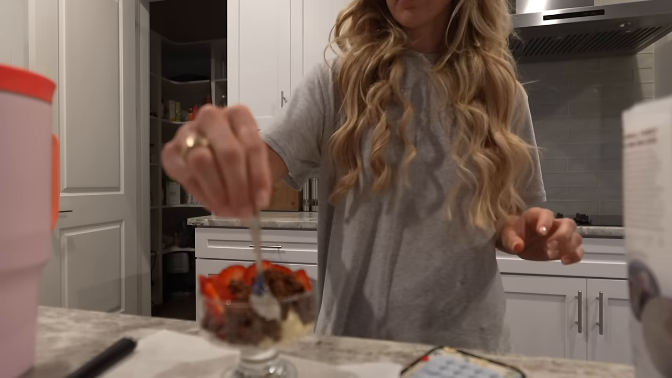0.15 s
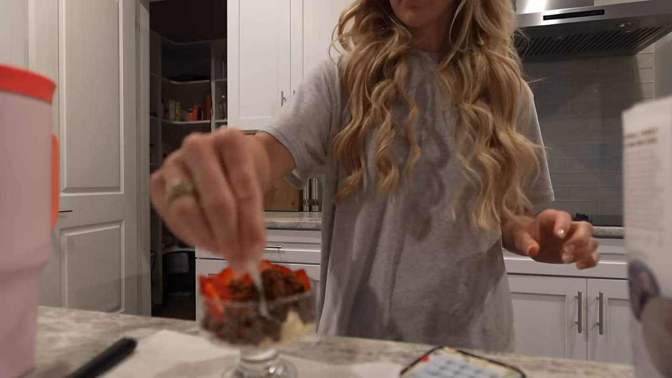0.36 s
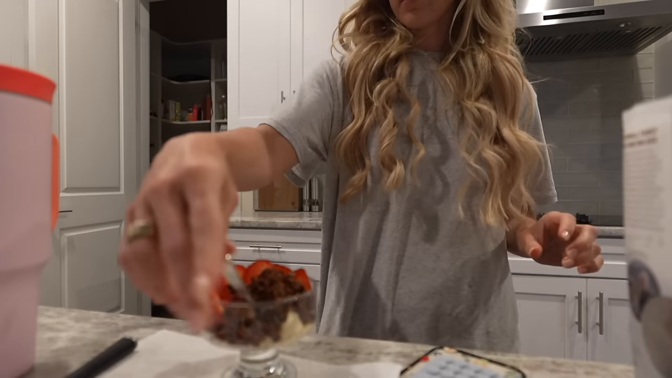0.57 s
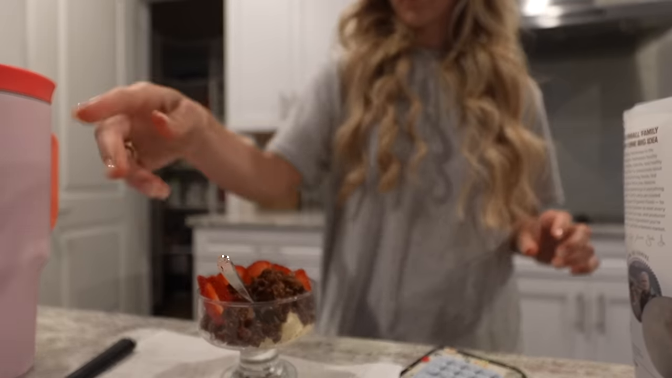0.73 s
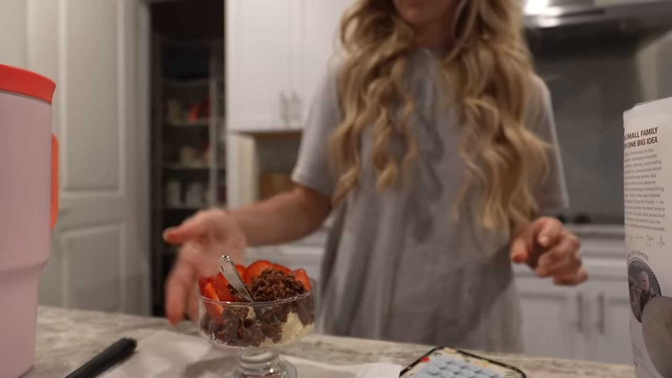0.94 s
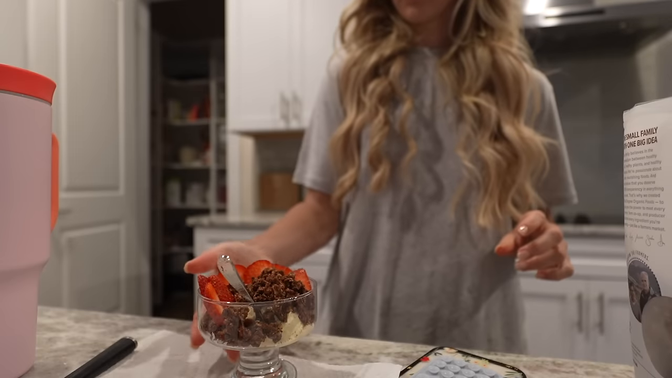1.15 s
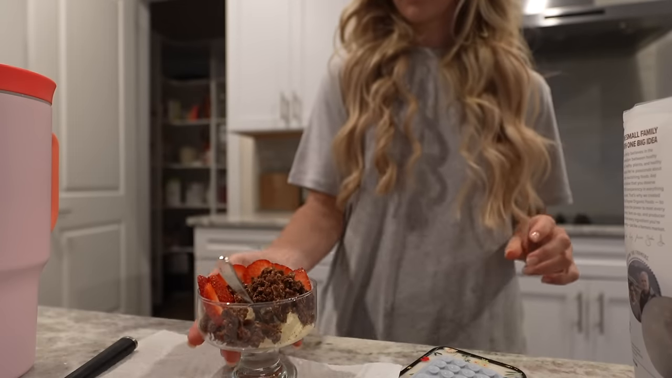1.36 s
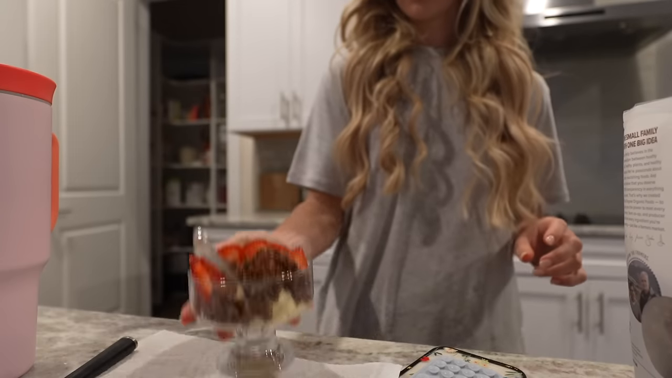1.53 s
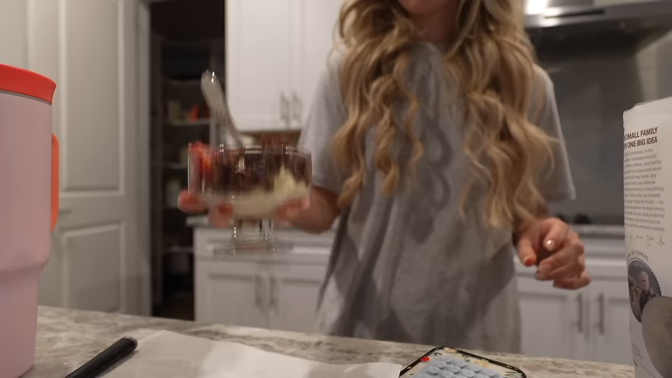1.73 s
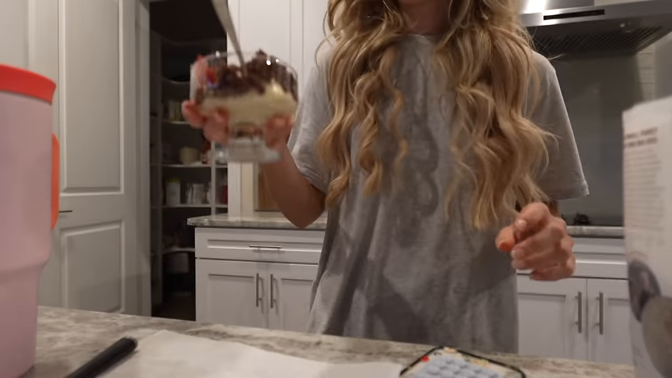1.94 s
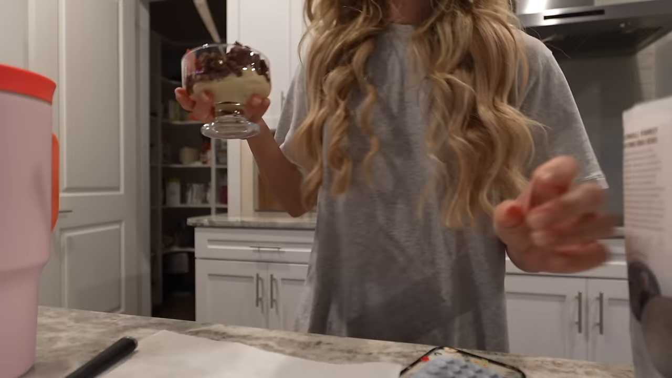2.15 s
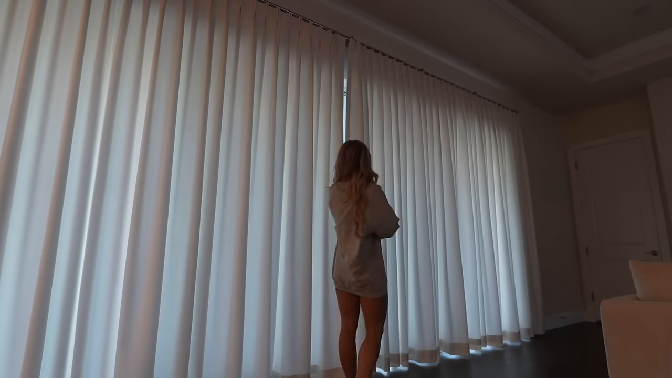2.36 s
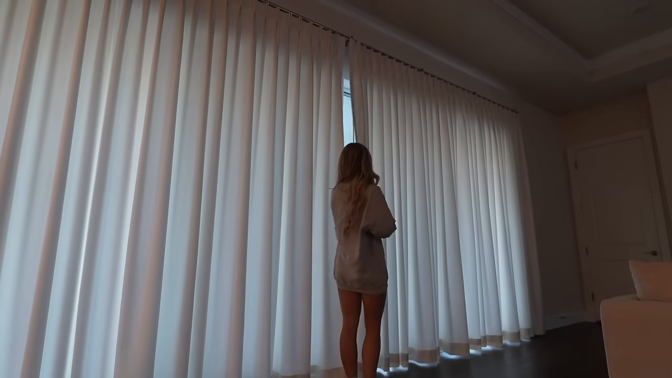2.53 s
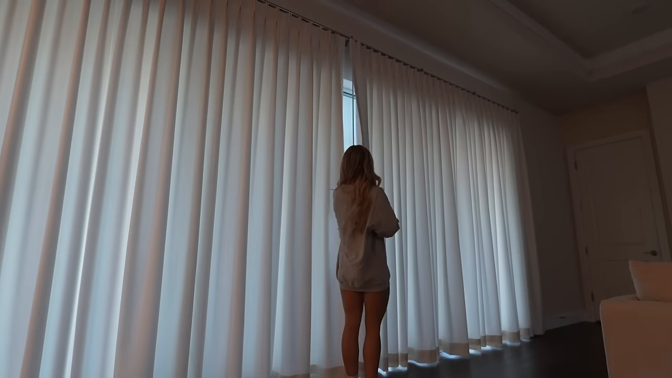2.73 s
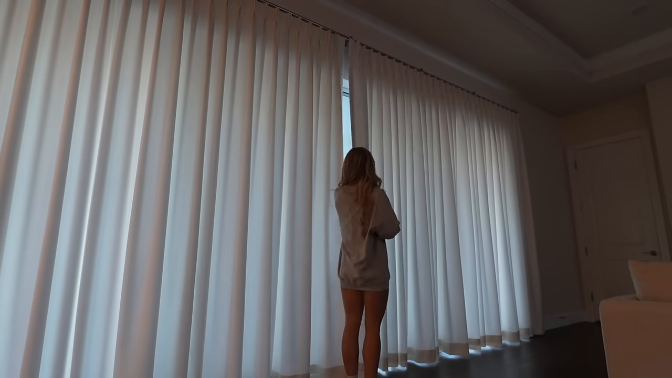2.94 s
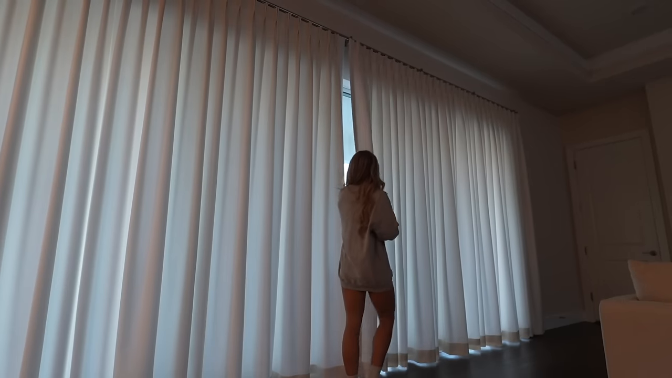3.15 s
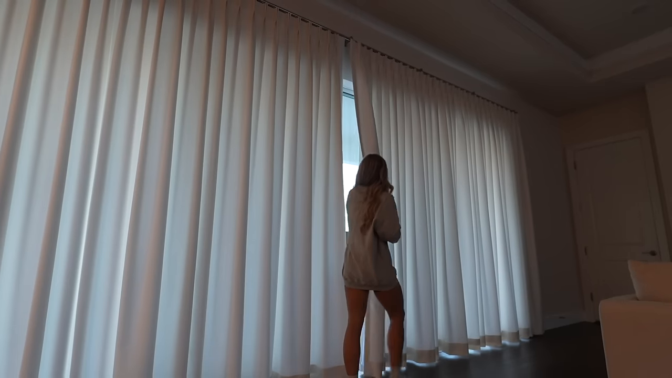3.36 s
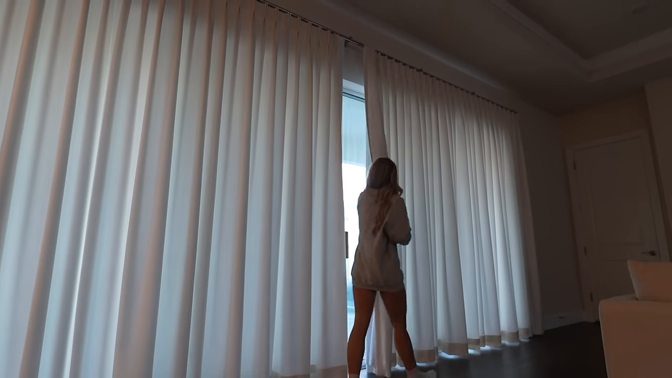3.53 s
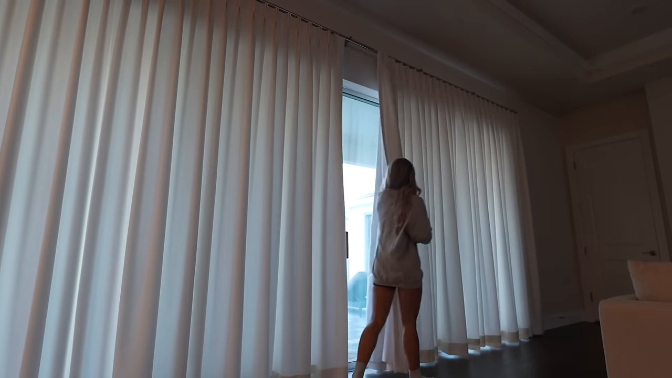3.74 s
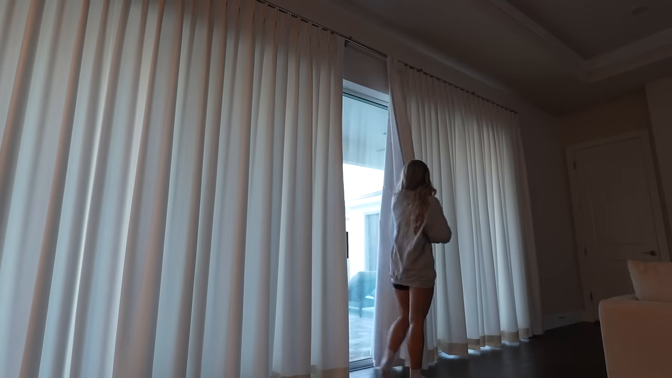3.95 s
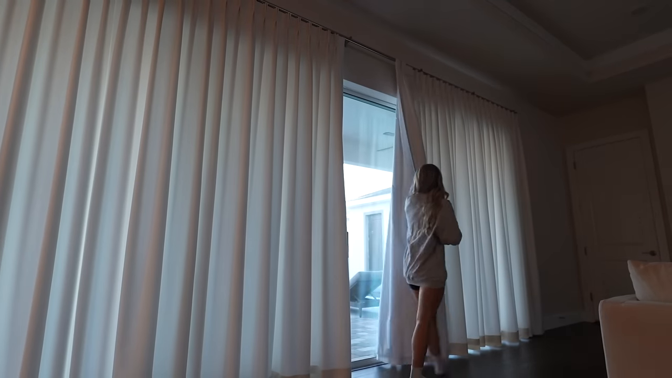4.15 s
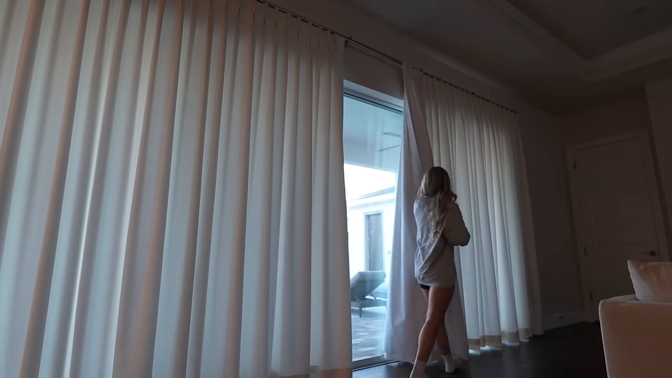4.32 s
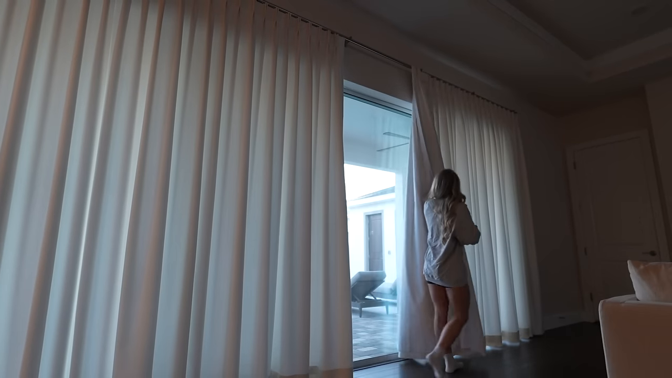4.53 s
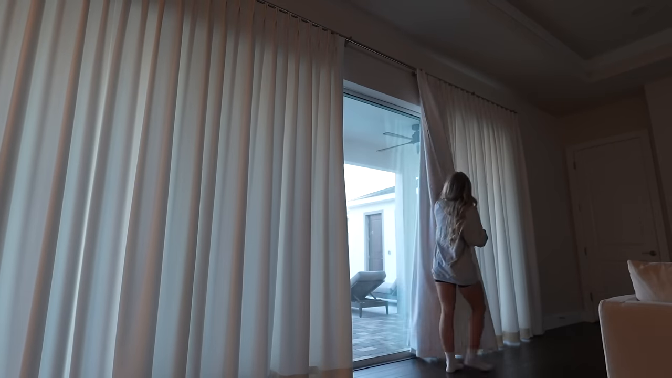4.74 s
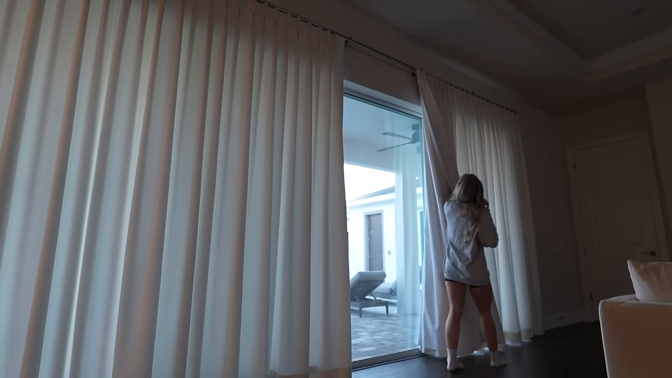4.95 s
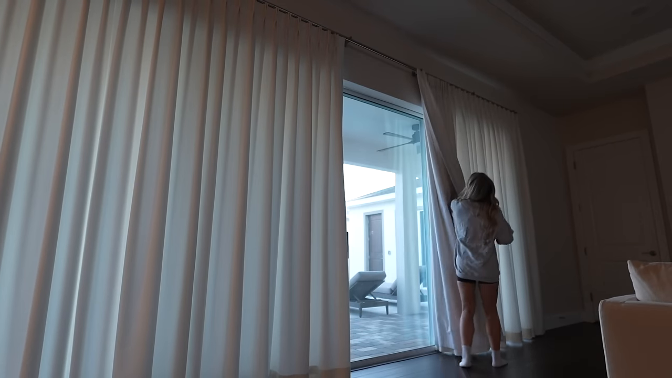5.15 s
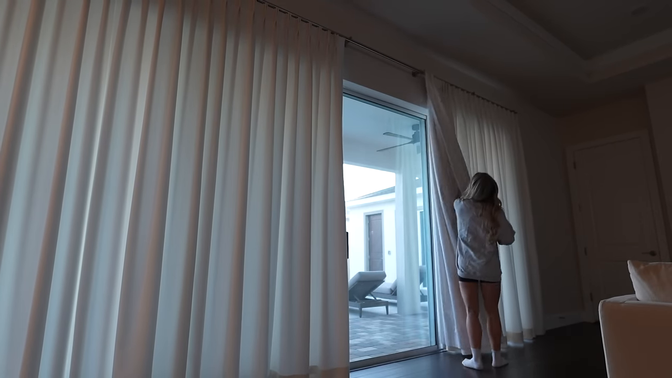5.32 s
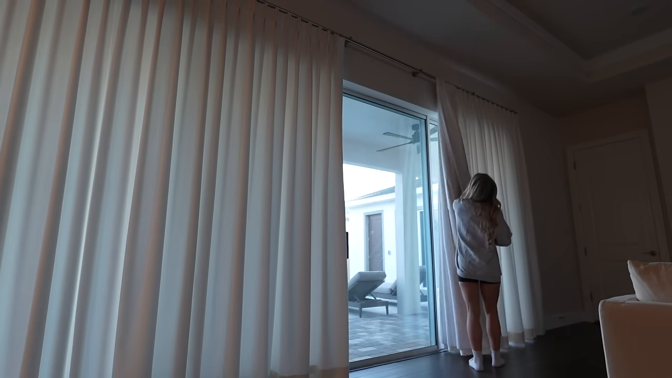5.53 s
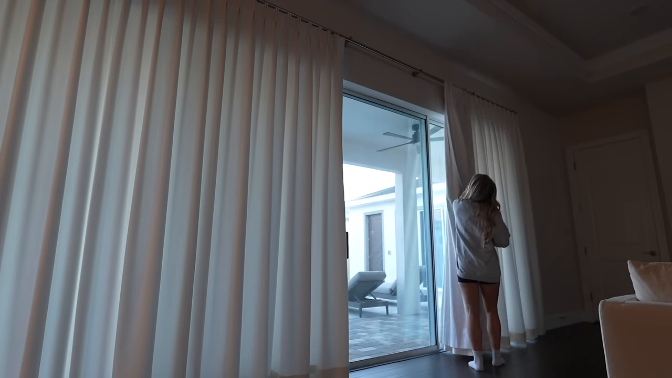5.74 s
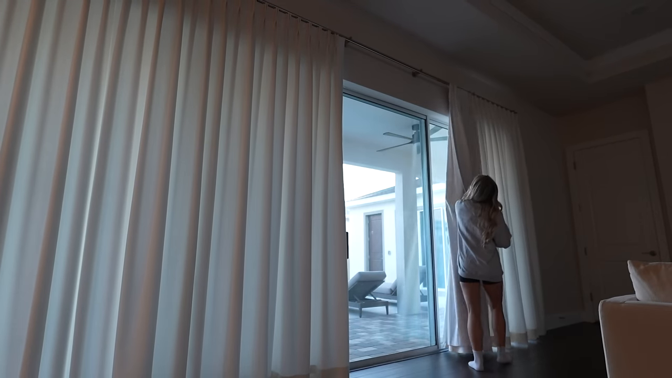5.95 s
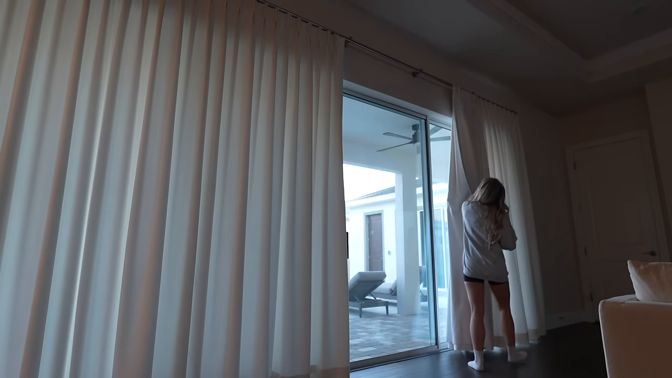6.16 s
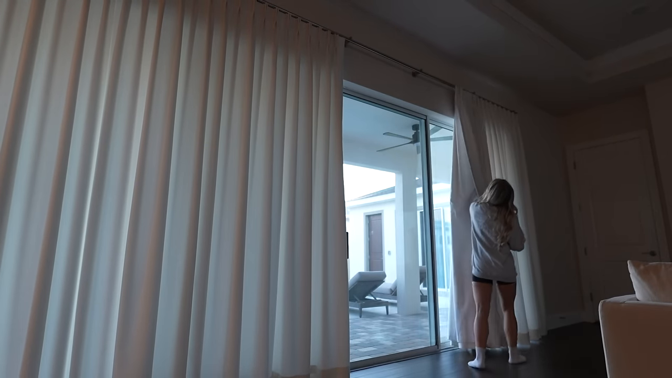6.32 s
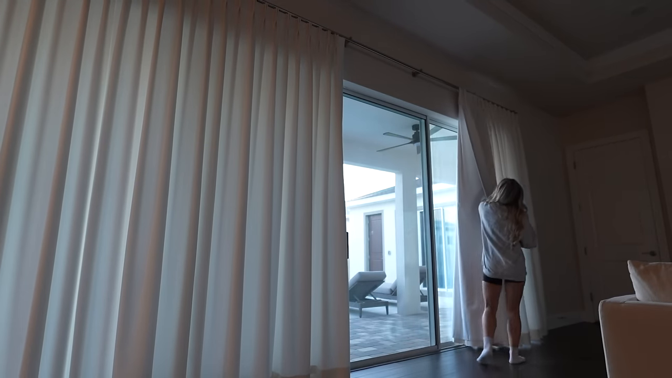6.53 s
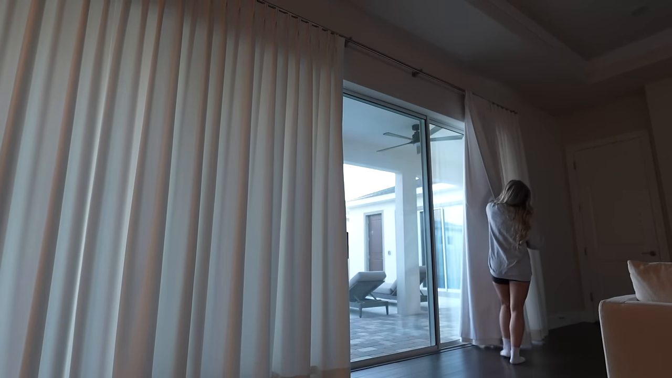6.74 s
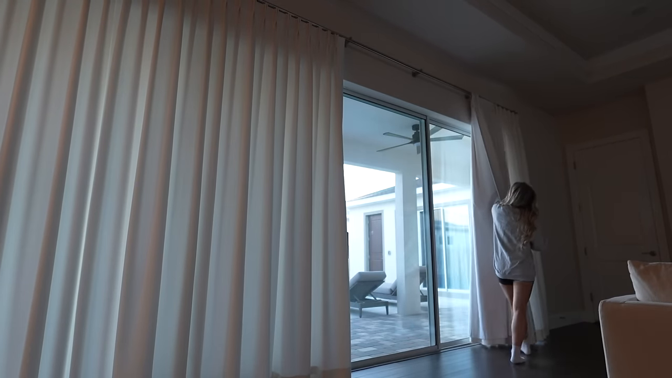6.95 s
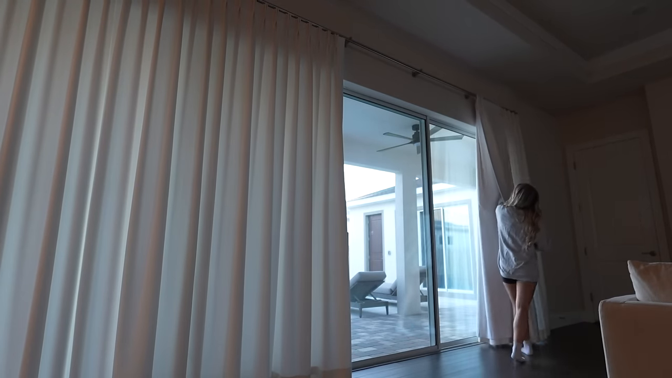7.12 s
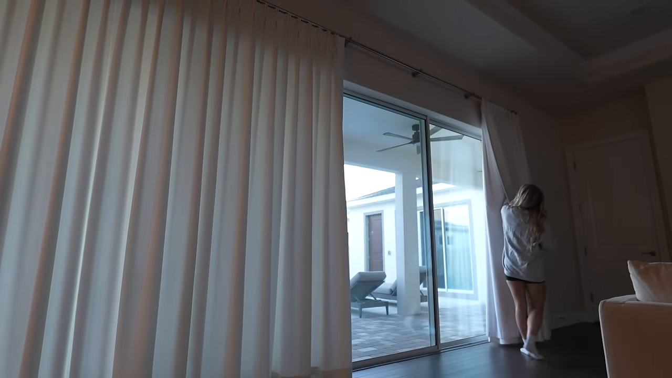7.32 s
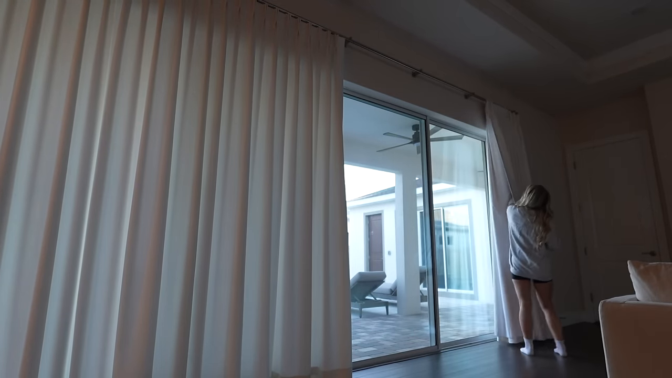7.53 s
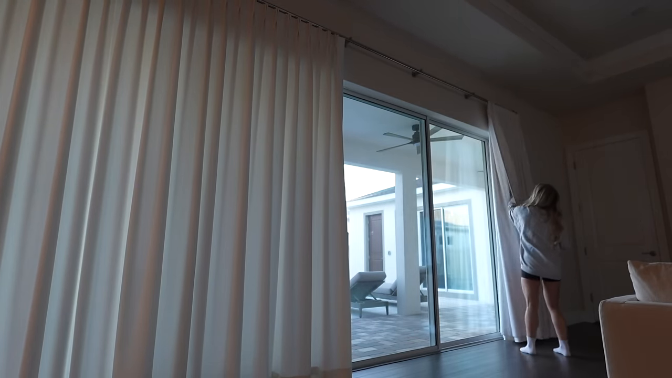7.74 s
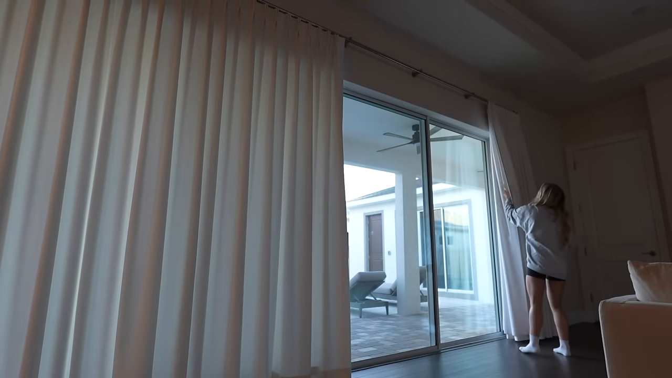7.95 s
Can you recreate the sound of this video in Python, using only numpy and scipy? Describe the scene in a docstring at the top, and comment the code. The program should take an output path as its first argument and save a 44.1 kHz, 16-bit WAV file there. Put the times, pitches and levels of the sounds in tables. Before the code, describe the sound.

In a quiet, slightly echoing kitchen, a spoon clinks three times against a glass dessert bowl, ringing brightly. Fingers touch the glass faintly. Then, in a hard-floored bedroom, a few soft footsteps lead to heavy curtains being drawn open in three pulls: gliders rattle and bump, the rail drums and groans, and the cloth swishes. It is heard from a few metres, almost in mono, over faint ventilation rumble.

```python
"""A spoon clinks in a glass dessert bowl in a quiet, live kitchen: each contact cracks and rings both.
Fingers touch and lift the bowl. Then, in a hard-floored bedroom, someone steps up to heavy curtains and
draws them open in three pulls: gliders rattle and bump, the rail drums on its mounting and groans, the
cloth swishes. Heard from a few metres, almost in mono, over faint air and ventilation rumble."""
import sys
import numpy as np
from scipy import signal
from scipy.fft import rfft, irfft
from scipy.io import wavfile
from scipy.ndimage import uniform_filter1d

SR = 44100
rng = np.random.default_rng(int(sys.argv[2]) if len(sys.argv) > 2 else 0)


def digitize_waveform(pressure):
    """Quantize a signal to 16-bit integers and store it at the path in sys.argv[1].

    Rows of a 2-D input are taken as channels; values are limited to [-1, 1].
    """
    field = np.atleast_2d(pressure).T
    bounded = np.clip(field, -1, 1)
    quanta = np.round(bounded * 32767).astype(np.int16)
    wavfile.write(sys.argv[1], SR, quanta)


N = 356320
TIME = np.arange(N) / SR

# spoon on glass: t/s, ring level/dB, crack level/dB, crack T60/s, crack cutoff/Hz, contact point 0-2
CLINKS = [(0.0095, -2, -5, 0.38, 15040, 0), (0.0178, -17.5, -13.5, 0.057, 15000, 0),
          (0.3225, -5, -19, .006, 14000, 1), (0.3244, -10.5, -24.5, .006, 13940, 1),
          (0.3338, -19, -33.5, .02, 14000, 1), (0.517, -1.5, -8, 0.012, 8960, 2),
          (0.52, -12.5, -6.5, .008, 9000, 2), (0.528, -21, -22.5, .02, 9000, 2),
          (1.131, -50, -35.5, .008, 15000, 1), (1.142, -54, -51, .008, 15000, 1)]
# spoon and bowl modes: f/Hz, width/Hz, level/dB at contact points 0, 1, 2
BOWL_MODES = [(1357, 55, 5, 7, 5), (1921, 20, 23.5, -10.5, 3.5), (2500, 41, 2.5, 5.5, 16.5),
              (2577, 34, -0.5, -10.5, 19.5), (2630, 44, 2.5, -9.5, 14), (2923, 52, 14, -3, 7),
              (3490, 170, 1.5, -8, 9), (3960, 130, -3, -8, 5.5), (4440, 45, 16.5, 2.5, -7),
              (5160, 140, -6.5, -6, 4), (5390, 170, -3, 5.5, 10.5), (5800, 126.4, -8.5, 4, -3),
              (6180, 40, 22, -9.5, -6), (6320, 72, -7.5, -11, 12), (8280, 70, 13, -11, -4),
              (8300, 92, 14.5, -16, -3), (8350, 180, -0.5, -17, 1.5), (10450, 110, 16, -15.5, 8),
              (13130, 200, -8.5, -19, -10)]
# fingers on the bowl: t/s, f/Hz, level/dB
FINGER_TOUCHES = [(1.339, 930, -23.5), (1.487, 1090, -24), (1.525, 950, -26)]

# curtain speed per pull, as rattle drive: t/s, level/dB
PULL_1 = [(3.36, -65), (3.536, -33.5), (3.628, -34), (3.84, -39), (4.244, -39.5), (4.69, -29),
          (4.712, -40.5), (5.038, -59.5), (5.22, -57)]
PULL_2 = [(5.23, -60), (5.268, -31.5), (5.306, -36.5), (5.318, -28.5), (5.502, -35), (5.766, -37.5),
          (6.25, -50)]
PULL_3 = [(6.35, -48.5), (6.648, -42), (6.652, -39), (6.86, -36.5), (7.582, -40.5), (8.08, -57)]
# glider collisions: t/s, clack level/dB, thump level/dB
GLIDER_BUMPS = [(3.355, -36, -47), (3.426, -24, -38), (3.469, -9, -35.5), (3.526, -4, -20),
                (3.602, -12, -14), (4.4724, -3, -17), (4.5281, -1, -9), (4.637, -4.5, -3.5),
                (4.653, -9, -10.5), (4.678, -14, -17), (4.685, -22, -13), (4.735, -23, -13),
                (5.2538, -16, -7.5), (5.268, -17, -9), (5.286, -16, -1.5), (5.32, -10, -2), (5.34, -8, -2),
                (5.372, -27, -8), (5.41, -9, -11), (6.655, -27, -18), (7.1528, -17, -30), (7.622, -25, -14)]
# footfalls: t/s, thud level/dB, scuff level/dB, tick level/dB (before a common trim)
STEPS = [(2.245, -35, -32, -62), (2.275, -50, -29, -55), (2.574, -37, -25.5, -45), (2.611, -26, -34, -46),
         (2.958, -34, -52, -21), (2.985, -21, -48, -38), (3.078, -17, -48, -31), (3.094, -10.5, -53, -31),
         (3.135, -18.5, -54, -46)]

# resonances: f/Hz, width/Hz, level/dB re broad response
RAIL_MODES = [(148.5, 5.4, -3), (204.4, 13.7, -3), (309.5, 20, -17.5), (548, 25, -9), (645, 12, -9.5),
              (764, 21, -10), (2007, 55, -4.5), (2274, 21, -14), (2440, 31, -7.5), (2560, 60, -3.5),
              (3010, 30, -29.5), (3136, 27, -6.5), (3310, 20, -7.5), (3760, 89, -6.5), (4630, 32, -25)]
METAL_MODES = [(2800, 100, 1), (4270, 90, 0), (4910, 50, 10), (5595, 50, 6), (9650, 160, 3)]   # small part rung by each tick

# swells: peak t/s, rise/s, fall/s, level/dB
BOWL_LIFT = [(1.98, 0.16, .5, -74)]
GLIDER_BINDS = [(4.61, .2, .13, -30.5), (7.1, 1, 0.57, -53.5)]
HEM_SWINGS = [(3.65, .2, 0.37, -64), (4.74, .35, 0.12, -44.5), (7.95, .5, .25, -55)]   # curtain starts or stops
CLOTH_SNAPS = [(3.53, 0.065, .1, -46), (5.345, .1, .15, -43)]   # tugged taut
CLOTHES_BRUSHES = [(1.97, .12, 0.25, -73.5), (2.37, 0.16, 0.14, -60), (2.605, 0.06, 0.089, -55),
                   (2.9, 0.72, .6, -70.5), (3.2, 0.39, .2, -66.5)]

# spectral shapes: f/Hz, relative level/dB
CRACK_SHAPE = [(300, -56.5), (750, -39.5), (1000, -25.5), (1250, 4.5), (1700, 2.5), (3200, 3.5),
               (5000, -0.5), (7400, -2), (9000, 3), (12000, -15.5), (16000, -10)]   # spoon contact
RATTLE_SHAPE = [(500, -39.5), (1000, -23), (1500, -20.5), (1850, -6.5), (2200, -2.5), (2620, -0.5),
                (3200, -4), (4500, -9), (6500, -15), (10000, -17.5), (16000, -45)]   # sliding gliders
DRUM_SHAPE = [(25, -34.5), (65, -23), (112, -18), (145, -6), (200, -1.5), (280, -0.5), (400, 0),
              (560, -2.5), (760, -6), (950, -16.5), (1500, -34.5)]   # rail on its mounting
CLACK_SHAPE = [(600, -29), (1100, -10), (1600, -22), (2500, -2.5), (3500, 0), (5000, -3), (8000, -5.5),
               (11000, -4.5), (16000, -19)]   # glider on glider
THUMP_SHAPE = [(25, -37), (62, -27), (100, -16), (130, -2.5), (210, 0), (330, 2.5), (420, -11), (600, -14),
               (1200, -39.5)]   # jolted mounting
SWISH_SHAPE = [(900, -3), (3000, -3), (5500, 6), (7500, 1), (10000, -2), (12500, -3.5), (16000, -7)]   # curtain folds
HEM_SHAPE = [(25, -20), (65, -4), (95, -13), (125, 2), (150, 2), (200, -6), (400, -30), (1000, -61)]
STEP_THUD_SHAPE = [(30, -18), (90, -4.5), (145, 0.5), (255, 1.5), (310, -4.5), (390, -3.5), (520, -21),
                   (800, -50), (2000, -60)]
STEP_SCUFF_SHAPE = [(200, -11), (550, -4), (800, 0.5), (1100, -12), (1600, -29), (5000, -19.5)]
STEP_TICK_SHAPE = [(1000, -12), (2300, 3), (3400, 1), (4800, 1.5), (6200, -2), (7200, -14), (9500, -7),
                   (12000, -28), (16000, -32)]
CLOTHES_SHAPE = [(500, -20.5), (900, -18.5), (1300, 2.5), (2200, 5), (3300, 1.5), (5000, 5), (7500, 0.5),
                 (11000, 1), (16000, -9)]
AIR_SHAPE = [(12, -54), (20, -21.5), (55, -7.5), (120, -4), (154, -4.5), (177, -7), (248, -5), (459, -21),
             (542, -29), (590, -23.5), (923, -29), (1960, -37), (7950, -39.5), (13900, -30), (16000, -39)]
VENTILATION_SHAPE = [(20, -18), (40, -23), (52, -3), (64, -1.5), (85, -2), (130, -35), (300, -25),
                     (1000, -33), (4000, -43)]

# reverberation: f/Hz, T60/s
KITCHEN_T60 = [(300, 0.48), (2200, 0.74), (5500, 0.58), (9000, 0.61), (15000, 0.25)]
BEDROOM_T60 = [(100, 1), (300, 0.44), (2500, 0.59), (6000, 0.5), (14000, 0.43)]


def spoon():
    """Each contact cracks and rings spoon and bowl; the contact point sets the mix of modes."""
    cracks = np.zeros(N)
    for t_s, _, crack_db, t60_s, cutoff_hz, _ in CLINKS:   # blunter contact, duller crack
        lowpass = signal.butter(3, cutoff_hz, fs=SR, output="sos")
        cracks += signal.sosfilt(lowpass, bursts([t_s], [crack_db], t60_s) + 1e-18)
    clinks = colour(cracks, CRACK_SHAPE)
    times_s, ring_db, *_, point = np.transpose(CLINKS)
    onsets = np.round(times_s * SR).astype(int)
    for f_hz, width_hz, *point_db in BOWL_MODES:
        strikes = np.zeros(N)
        strikes[onsets] = from_db(ring_db + np.array(point_db)[point.astype(int)])
        clinks += resonance(strikes, f_hz, width_hz)
    highpass = signal.butter(4, 1050, "high", fs=SR, output="sos")   # a small body radiates no bass
    return signal.sosfilt(highpass, clinks)


def fingers():
    """A fingertip damps the glass, leaving one short low note."""
    return sum(resonance(bursts([t_s], [level_db], t60_s=0.01), f_hz, width_hz=97)
               for t_s, f_hz, level_db in FINGER_TOUCHES)


def lifted_bowl(ring_hz=2220):
    """Light rubbing keeps one note ringing as the bowl is carried off."""
    rubbing = resonance(rng.standard_normal(N), ring_hz, width_hz=600)
    return swells(BOWL_LIFT) * rms_one(resonance(rubbing, ring_hz, width_hz=130))


def curtain_motion(rail_lag_s=0.024):
    """Speed as a gain, the heavy rail's lagging response, and the share of gliders gathered (0-1)."""
    times_s, level_db = np.vstack([PULL_1, PULL_2, PULL_3]).T
    speed = from_db(np.interp(TIME, times_s, level_db, left=-120))
    pole = np.exp(-1 / (rail_lag_s * SR))
    shaking = signal.lfilter([1 - pole], [1, -pole], speed)
    gathered = np.cumsum(speed) / speed.sum()
    return speed, shaking, gathered


def gliders(speed, shaking, gathered):
    """Gliders chatter, denser with speed, and rub and collide; the rail rings and drums on its mounting."""
    rattle_db, drum_db, rub_db = -2, -7.5 + 3 * gathered, -18.5 + 8.5 * gathered
    chatter = grains(rate_per_s=400 + 1000 * np.sqrt(speed / speed.max()), spread_db=2.5)
    sliding = chatter + from_db(-5.5) * rng.standard_normal(N)
    rattle = speed * from_db(rattle_db) * colour(sliding, RATTLE_SHAPE)
    drum = shaking * from_db(drum_db) * colour(sliding, DRUM_SHAPE)
    friction = resonance(rng.standard_normal(N), f_hz=1170, width_hz=580)
    rub = shaking * from_db(rub_db) * rms_one(resonance(friction, f_hz=1360, width_hz=1840))
    times_s, clack_db, thump_db = np.transpose(GLIDER_BUMPS)
    clacks = colour(bursts(times_s, clack_db, t60_s=0.035), CLACK_SHAPE)
    thumps = colour(bursts(times_s, thump_db, t60_s=0.035), THUMP_SHAPE)
    return add_modes(rattle + drum + rub + clacks + thumps, RAIL_MODES)


def rail_groan(shaking, gathered, mode_hz=273.2):
    """Friction drives a low bending mode of the rail, hardest where the gliders bind."""
    friction = resonance(rng.standard_normal(N), mode_hz, width_hz=200)
    drag = shaking * from_db(-17 + 1.5 * gathered) + swells(GLIDER_BINDS)
    return drag * rms_one(resonance(friction, mode_hz, width_hz=12))


def curtain_cloth(speed, shaking, gathered):
    """Folds and hooks rub in a fine, bright crackle; the heavy hem flaps softly."""
    swish_db, steady_pull_db, hem_db = -45 + gathered, -37, -36
    rubbing = grains(rate_per_s=1600, spread_db=3.5) + from_db(-4) * rng.standard_normal(N)
    swish_gain = from_db(swish_db) * (speed / from_db(steady_pull_db)) ** 0.79 + swells(CLOTH_SNAPS)
    hem_gain = from_db(hem_db) * shaking + swells(HEM_SWINGS)
    return swish_gain * colour(rubbing, SWISH_SHAPE) + hem_gain * colour(rng.standard_normal(N), HEM_SHAPE)


def walker(tick_trim_db=-3):
    """Soft footfalls thud, scuff and tick; the ticks ring a small metal part; clothes brush."""
    times_s, thud_db, scuff_db, tick_db = np.transpose(STEPS)
    thuds = colour(bursts(times_s, thud_db, t60_s=0.09), STEP_THUD_SHAPE)
    scuffs = colour(bursts(times_s, scuff_db, t60_s=0.17), STEP_SCUFF_SHAPE)
    ticks = colour(bursts(times_s, tick_db + tick_trim_db, t60_s=0.11), STEP_TICK_SHAPE)
    clothes = swells(CLOTHES_BRUSHES) * colour(grains(rate_per_s=6600, spread_db=0.5), CLOTHES_SHAPE)
    return thuds + scuffs + add_modes(ticks, METAL_MODES) + clothes


def background(air_db=-63.5, ventilation_db=-64.5, bedroom_from_s=2.23):
    """Faint steady air; ventilation adds a deeper rumble in the bedroom."""
    air = colour(rng.standard_normal(N), AIR_SHAPE)
    rumble = colour(rng.standard_normal(N) * (TIME > bedroom_from_s), VENTILATION_SHAPE)
    return from_db(air_db) * air + from_db(ventilation_db) * rumble


def room(x, t60_table, direct_db, buildup_s):
    """Direct sound plus a diffuse tail that decays band by band; total power is kept."""
    age_s, f_hz = TIME[:SR], np.fft.rfftfreq(SR, 1 / SR)
    white, tail = rfft(rng.standard_normal(SR)), 0
    edges_hz = np.geomspace(20, SR / 2, 16)
    for low_hz, high_hz in zip(edges_hz, edges_hz[1:]):
        band = irfft(white * ((f_hz >= low_hz) & (f_hz < high_hz)), SR)
        tail += band * from_db(-60 * age_s / at_hz(t60_table, np.sqrt(low_hz * high_hz)))
    tail *= np.clip(age_s / buildup_s, 0, 1) ** 2
    spectrum = rfft(tail / np.linalg.norm(tail) + from_db(direct_db) * (age_s == 0))
    flat = spectrum / np.sqrt(uniform_filter1d(np.abs(spectrum) ** 2, 41))   # diffuse: no favoured pitch
    return signal.fftconvolve(x, irfft(flat, SR)[:SR * 3 // 4])[:N]


def bursts(times_s, energies_db, t60_s):
    """One decaying burst of micro-impacts per contact."""
    out, age_s = np.zeros(N + SR), TIME[:SR // 4]
    for t_s, energy_db in zip(times_s, energies_db):
        burst = rng.standard_normal(len(age_s)) * from_db(-60 * age_s / t60_s)
        start = round(t_s * SR)
        out[start:start + len(burst)] += from_db(energy_db) * burst / np.linalg.norm(burst)
    return out[:N]


def grains(rate_per_s, spread_db):
    """Random clicks of uneven size; same power at any rate."""
    hits = rng.random(N) < rate_per_s / SR
    sizes = from_db(spread_db * np.minimum(rng.exponential(1, N), 3.5))
    signs = rng.choice([-1, 1], N)
    return rms_one(hits * sizes * signs / np.sqrt(rate_per_s))


def swells(rows):
    """Gain envelope; each swell moves 20 dB per rise or fall time."""
    return sum(from_db(level_db - 20 * np.maximum((t_s - TIME) / rise_s, (TIME - t_s) / fall_s))
               for t_s, rise_s, fall_s, level_db in rows)


def colour(x, shape, n_fft=8192):
    """Minimum-phase filter; white noise keeps its power."""
    cepstrum = irfft(np.log(from_db(at_hz(shape, np.fft.rfftfreq(n_fft, 1 / SR)))))
    causal_fold = 1 + np.sign(n_fft // 2 - np.arange(n_fft))
    response = irfft(np.exp(rfft(cepstrum * causal_fold)))
    return signal.fftconvolve(x, response / np.linalg.norm(response))[:N]


def resonance(x, f_hz, width_hz):
    """Two-pole band-pass, unity peak gain."""
    r = np.exp(-np.pi * width_hz / SR)
    feedback = [1, -2 * r * np.cos(2 * np.pi * f_hz / SR), r * r]
    return signal.lfilter(np.array([1, 0, -1]) * (1 - r * r) / 2, feedback, x + 1e-18)


def add_modes(x, modes):
    """Input plus the resonances it excites."""
    return x + sum(from_db(level_db) * resonance(x, f_hz, width_hz) for f_hz, width_hz, level_db in modes)


def at_hz(table, f_hz):
    """Interpolate over log frequency."""
    knots_hz, values = np.transpose(table)
    return np.interp(np.log(f_hz + 1e-9), np.log(knots_hz), values)


def from_db(level_db):
    return 10 ** (np.asarray(level_db) / 20)


def rms_one(x):
    return x / np.sqrt(np.mean(x ** 2) + 1e-20)


def scene():
    """Bowl in the kitchen, slightly left; curtain and steps in the bedroom, centred."""
    kitchen = room(spoon() + fingers() + lifted_bowl(), KITCHEN_T60, direct_db=0.5, buildup_s=0.0075)
    speed, shaking, gathered = curtain_motion()
    rail = gliders(speed, shaking, gathered) + rail_groan(shaking, gathered)
    cloth = curtain_cloth(speed, shaking, gathered)
    bedroom = room(rail + cloth + walker(), BEDROOM_T60, direct_db=1.0, buildup_s=0.0084)
    pan_db = [[0.35], [-0.35]]
    return kitchen * from_db(pan_db) + bedroom + background()


def record(dry):
    """Steep elliptic low-pass."""
    cutoff_hz = 15800
    return signal.sosfilt(signal.ellip(12, 0.1, 90, cutoff_hz, fs=SR, output="sos"), dry)


dry = scene()
out = record(dry)
digitize_waveform(out)
```